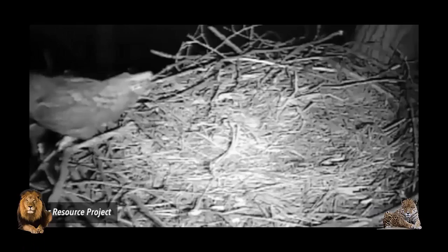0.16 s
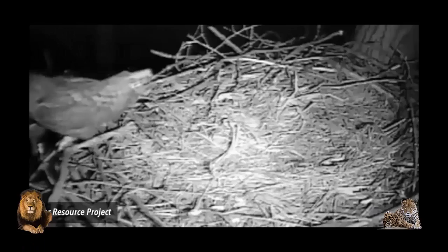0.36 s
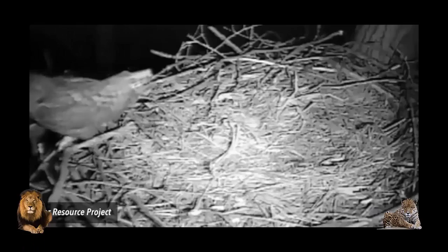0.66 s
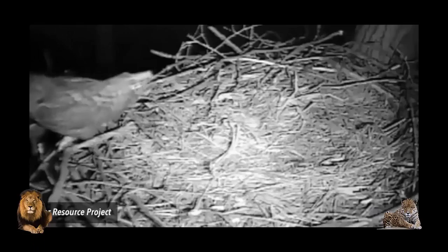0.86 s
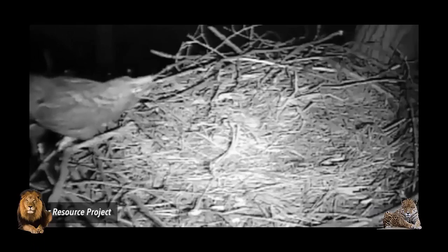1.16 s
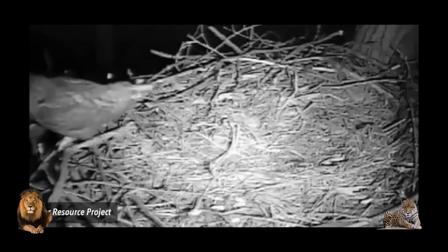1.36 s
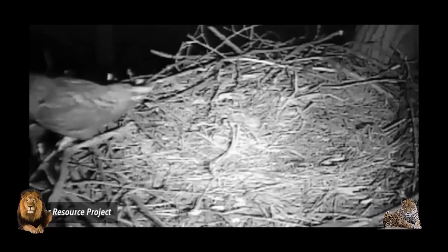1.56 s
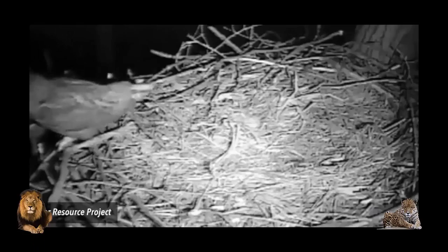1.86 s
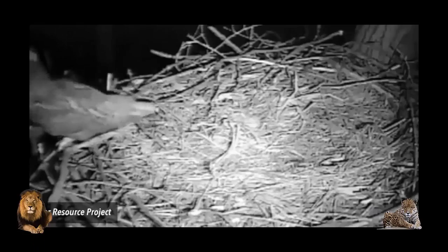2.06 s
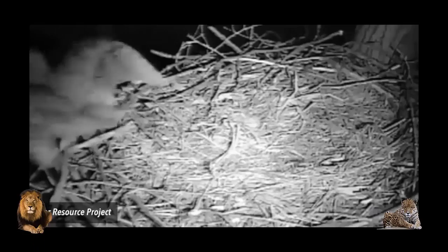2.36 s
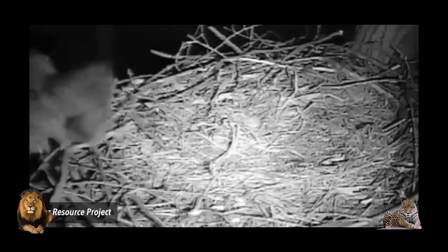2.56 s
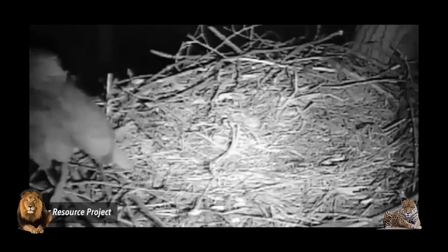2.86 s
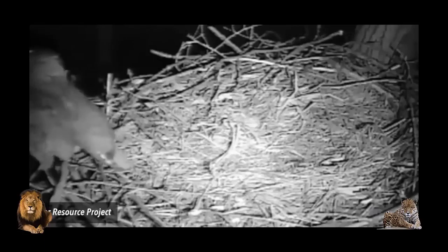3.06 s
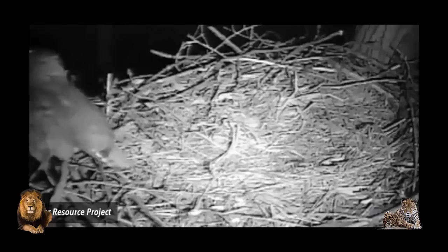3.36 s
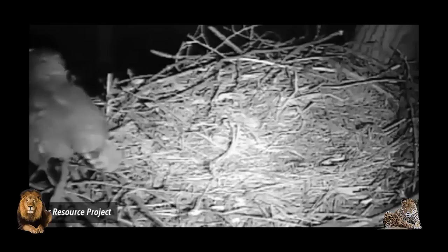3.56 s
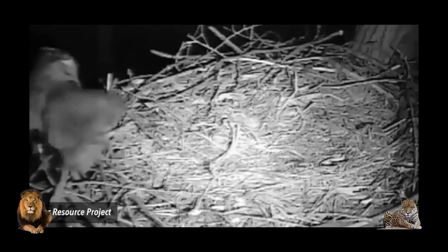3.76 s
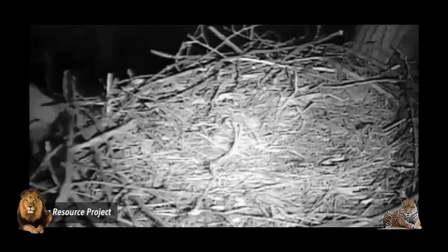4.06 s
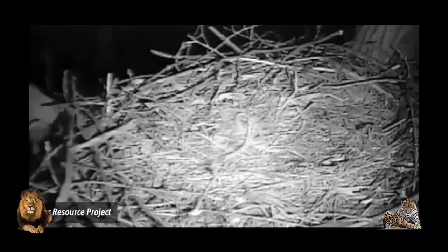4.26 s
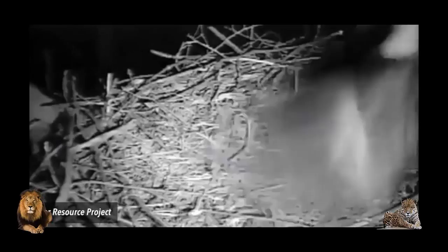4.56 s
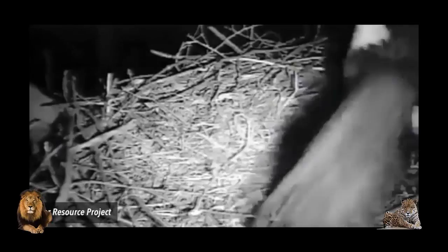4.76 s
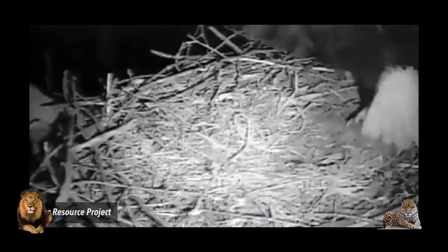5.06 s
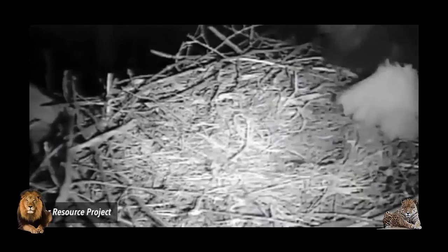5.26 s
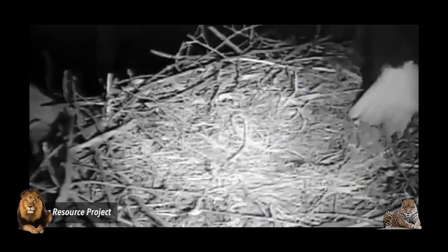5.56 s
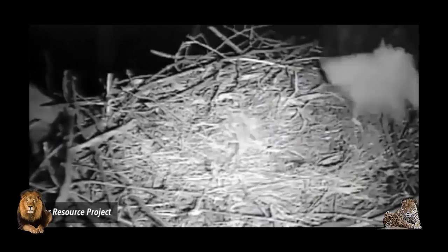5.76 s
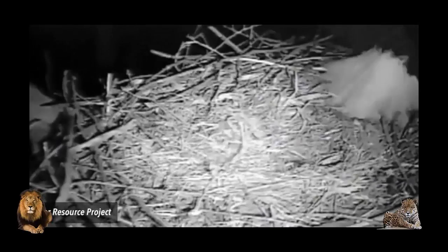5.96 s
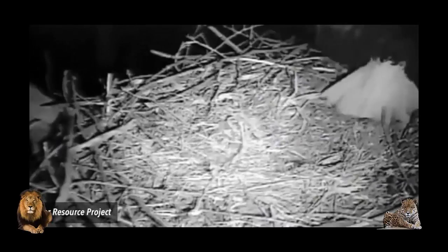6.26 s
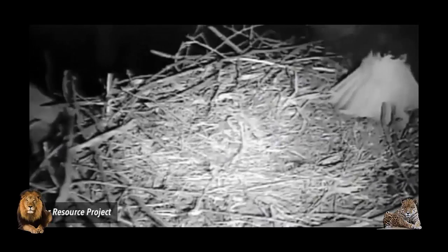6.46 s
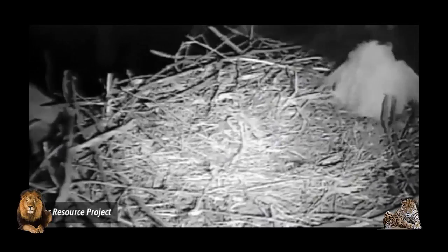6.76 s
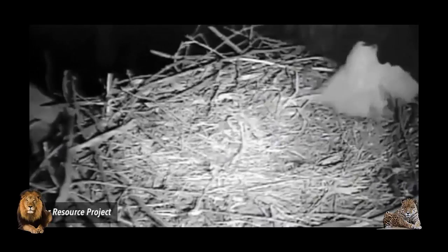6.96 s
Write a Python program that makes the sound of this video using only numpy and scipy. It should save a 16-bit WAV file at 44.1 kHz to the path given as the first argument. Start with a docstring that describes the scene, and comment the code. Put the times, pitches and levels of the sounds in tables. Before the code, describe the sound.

A nest microphone outdoors at night picks up soft low air noise and a faint mains hum, whose buzz grows later. At 0.7 s a very close owl gives a loud, round hoot around 300 Hz, about a third of a second, flattened by overload; a shorter, hoarser one comes at 1.5 s, rising slightly. From 1.95 to 2.45 s a farther owl answers with four quick arched hoots, then three falling ones from 3.05 to 3.4 s, blurred by trunk echoes. Faint clucks and grainy chitters begin near 2.6 s, ending in thin whistles at 3.65 s and, much louder and piercing, 3.87 s. Twigs scrape and knock; hard woody cracks hit at 4.18 and 4.5 s, the latter with a dull thud. Nasal yelps sound at 4.8 and 5.1 s. Bursts of stick knocks, snaps and straw scraping follow around 5.5 and 6.6 s, then subside to faint rustle by 7 s.

```python
"""An owl hoots twice, so close that the nest microphone overloads: throat tones with an octave and rushing air.
Its mate answers from the trees in short arched tones with trunk echoes. At an eagle's stick nest by night,
the eagle chitters (noise rasps, whistles), lands and treads on twigs and dry straw (filtered fractures,
ringing sticks, snaps, thuds), yelping (overtone stacks) meanwhile. Noise-made night air and mains hum lie below."""
import sys
import numpy as np
from scipy import signal
from scipy.fft import rfft, irfft
from scipy.io import wavfile
from scipy.ndimage import uniform_filter1d

SR = 44100
rng = np.random.default_rng(int(sys.argv[2]) if len(sys.argv) > 2 else 0)


def store_wav(level_fs):
    """Save 16-bit WAV to argv[1]."""
    pcm = np.round(np.clip(np.atleast_2d(level_fs), -1, 1) * 32767)
    wavfile.write(sys.argv[1], SR, pcm.T.astype(np.int16))


N = 314243
TIME = np.arange(N) / SR


def undb(db):
    """Decibels to gain."""
    return 10 ** (np.asarray(db) / 20)


def unit(x):
    """Scale to rms 1."""
    return x / np.sqrt(np.mean(x ** 2) + 1e-18)


def curves(rows, t=TIME):
    """The columns of a table, joined by straight lines in time."""
    s, *columns = np.transpose(rows)
    return [np.interp(t, s, c) for c in columns]


def add(out, start_s, x):
    """Mix x in at start_s."""
    i = max(int(start_s * SR), 0)
    out[i:i + len(x)] += x[:max(N - i, 0)]


def walk(rate_hz):
    """Smooth chance of rms 1, changing rate_hz times a second."""
    hold = max(int(SR / rate_hz), 1)
    steps = np.repeat(rng.standard_normal(N)[:N // hold + 1], hold)[:N]
    return unit(uniform_filter1d(steps, hold))


def turn(hz):
    """Phase of an oscillator that follows a pitch curve."""
    return 2 * np.pi * np.cumsum(hz) / SR


def envelope(age, attack_s, hold_s, release_s):
    """Swells up to age 0, holds, then dies away."""
    return np.exp(np.minimum(age, 0) / attack_s - np.maximum(age - hold_s, 0) / release_s)


def band(x, hz, width_hz):
    """One resonance, gain 1 at its centre."""
    centre_hz, width_hz = min(hz, SR / 3), min(width_hz, SR / 3)
    return signal.lfilter(*signal.iirpeak(centre_hz, hz / width_hz, fs=SR), x)


def colour(x, points, size=2048):
    """Minimum-phase filter shaped by (hz, db) points, scaled to unit impulse energy."""
    hz, db = np.transpose(points)
    bins_hz = np.arange(size // 2 + 1) * SR / size
    log_gain = np.log(undb(np.interp(np.log(bins_hz + 1), np.log(hz), db)))
    cepstrum = irfft(log_gain)
    # fold to the causal side
    cepstrum[1:size // 2] *= 2
    cepstrum[size // 2 + 1:] = 0
    response = irfft(np.exp(rfft(cepstrum)))
    return signal.fftconvolve(x, response / np.linalg.norm(response))[:len(x)]


def woods(x, t60_s):
    """Diffuse ring of the trees around the nest: a decaying noise tail, as strong as x."""
    t = np.arange(SR) / SR
    tail = rng.standard_normal(SR) * undb(-60 * t / t60_s) * (1 - np.exp(-t / .02))
    return unit(signal.fftconvolve(x, tail)[:N]) * np.std(x)


# night air spectrum: freq_hz, relative_db
AIR_SPECTRUM = [(20, -2.5), (55, -24), (95, -3.5), (170, -6.5), (300, -5), (600, -3), (900, -12),
                (1500, -21.5), (3000, -30.5), (7000, -33), (11000, -40.5)]


def night_air():
    """Faint coloured noise, slightly restless in level."""
    return unit(colour(rng.standard_normal(N), AIR_SPECTRUM)) * undb(-45.5 + 0.34 * walk(1.7))


# mains harmonics: multiple, relative_db
HUM_HARMONICS = [(1, 1), (2, -6.5), (3, -8.5), (4, -9), (5, -7.5), (6, -9), (7, -10)]
# hum level: time_s, base_db, third_multiple_extra_db
HUM_COURSE = [(0, -51.5, 1.5), (1.4, -49, -1), (2.4, -48, -1), (4, -49, 6.5), (5.8, -47.5, 6.5),
              (7.1, -49, 10)]
MAINS_HZ = 59.8


def mains_hum():
    """Harmonics of a slightly unsteady mains pitch; the third gains strength, so the buzz grows."""
    phase = turn(MAINS_HZ * (1 + 0.0019 * walk(5.5)))
    base_db, buzz_db = curves(HUM_COURSE)
    hum = 0
    for k, (_, relative_db) in enumerate(HUM_HARMONICS, 1):
        gain = undb(relative_db + (k == 3) * buzz_db + walk(6.2))
        hum = hum + gain * np.sin(k * phase + 2 * np.pi * rng.random())
    return np.sqrt(2) * undb(base_db) * hum


def crackle(rate_hz, spread_db):
    """Tiny fractures at random moments and signs, a few far larger than the rest; rms 1."""
    chance = rng.random((2, N))
    size = undb(spread_db * np.minimum(-np.log(chance[1] + 1e-9), 4))
    return unit((chance[0] < rate_hz / SR) * size * rng.choice([-1, 1], N))


# nest spectrum: freq_hz, relative_db
NEST_SPECTRUM = [(40, -18.5), (120, -6.5), (310, 0.5), (420, 0), (530, 0), (650, 0), (850, -4),
                 (1100, -8.5), (2000, -18.5), (2700, -31.5), (4500, -40.5), (7000, -41.5), (11000, -42)]
# ringing of the sticks, added to the nest: freq_hz, width_hz, relative_db
NEST_MODES = [(680, 430, -4.5), (1360, 47, -40), (1950, 600, -9)]


def through_nest(force):
    """The nest's woody body and the crisp top of its straw, split at 3.5 kHz, each at rms 1."""
    sound = colour(force, NEST_SPECTRUM)
    sound = sound + sum(undb(db) * band(sound, hz, width_hz) for hz, width_hz, db in NEST_MODES)
    body = signal.sosfilt(signal.butter(3, 3500, fs=SR, output="sos"), sound)
    top = signal.sosfilt(signal.butter(3, 3500, "high", fs=SR, output="sos"), sound)
    return unit(body), unit(top)


# width of one stick's own ring, struck or rubbed
RING_WIDTH_HZ = 122
# talons and feathers scraping: start_s, length_s, relative_db, crispness_db, stick_ring_hz
SCRAPE_EVENTS = [(3.695, 0.13, -42.5, -10, 380), (3.778, 0.027, -30.5, -18.5, 590),
                 (3.874, 0.029, -24, -19, 480), (3.918, 0.046, -32.5, -25, 715),
                 (4.12, 0.03, -18, -19.5, 595), (4.166, 0.016, -17.5, -14.5, 665),
                 (4.199, 0.099, -25.5, -12, 640), (4.319, 0.057, -38, -8.5, 640),
                 (4.434, 0.012, -35, -16, 590), (4.498, 0.028, -16.5, -17, 770),
                 (4.543, 0.075, -24, -8.5, 660), (4.705, 0.057, -32.5, -14.5, 545),
                 (4.919, 0.028, -21, -20.5, 670), (4.96, 0.028, -24, -20, 604),
                 (4.998, 0.058, -41.5, -5.5, 750), (5.18, 0.074, -46.5, -4, 640),
                 (5.343, 0.093, -39.5, -6.5, 570), (5.474, 0.027, -15, -17, 345),
                 (5.525, 0.058, -32.5, -13.5, 640), (5.607, 0.024, -30, -12.5, 810),
                 (5.789, 0.033, -32, -12.5, 680), (5.911, 0.052, -28, -14.5, 700),
                 (5.98, 0.13, -48.5, -1, 686), (6.128, 0.14, -42.5, -11, 666),
                 (6.509, 0.039, -39.5, -9, 664), (6.563, 0.068, -23.5, -12.5, 395),
                 (6.641, 0.055, -31, -16, 625), (6.76, 0.083, -41.5, -8, 480), (6.994, 0.17, -48, -7, 605)]
# faint rustle of feathers and straw under the moving bird: time_s, relative_db
STIRRING_COURSE = [(3.4, -48), (3.9, -42), (4.4, -49), (4.85, -31), (5.25, -40.5), (5.75, -44), (6.1, -47),
                   (7.1, -47)]
STIRRING_CRISP_DB = -13
# a scrape takes hold, lasts, lets go; the bent straw settles softer and crisper
SCRAPE_ATTACK_S, SCRAPE_RELEASE_S = 0.015, 0.013
SETTLE_DB, SETTLE_CRISP_DB, SETTLE_S = -20, 9, 0.087
BODY_DB, SCRAPE_RING_DB = -1.5, -4


def treading():
    """Talons drag in fits and starts: coarse fractures shake the nest and ring a stick, fine ones hiss."""
    coarse = crackle(rate_hz=1400, spread_db=3.6) * undb(2.2 * walk(70))
    body = through_nest(coarse)[0]
    fine = crackle(rate_hz=4000, spread_db=3) * undb(1.1 * walk(60))
    top = through_nest(fine)[1]
    body_power = undb(curves(STIRRING_COURSE)[0]) ** 2 * (TIME > STIRRING_COURSE[0][0])
    top_power = body_power * undb(STIRRING_CRISP_DB) ** 2
    rings = np.zeros(N)
    t = np.arange(-.06, .5, 1 / SR)
    for start_s, length_s, db, crisp_db, ring_hz in SCRAPE_EVENTS:
        drag = undb(db) * envelope(t, SCRAPE_ATTACK_S, length_s, SCRAPE_RELEASE_S)
        settle = undb(db + SETTLE_DB) * envelope(t, SCRAPE_ATTACK_S, length_s, SETTLE_S)
        onset_s = start_s + t[0]
        add(body_power, onset_s, drag ** 2 + settle ** 2)
        crisp_power = drag ** 2 + (undb(SETTLE_CRISP_DB) * settle) ** 2
        add(top_power, onset_s, undb(crisp_db) ** 2 * crisp_power)
        rubbed = drag * np.roll(body, -int(onset_s * SR))[:len(t)]
        add(rings, onset_s, band(rubbed, ring_hz, RING_WIDTH_HZ))
    shaken = undb(BODY_DB) * np.sqrt(body_power) * body
    return shaken + undb(SCRAPE_RING_DB) * rings + np.sqrt(top_power) * top


KNOCK_S = 1 / 8
# sticks knocking: start_s, peak_db, crispness_db, stick_ring_hz
KNOCK_EVENTS = [(3.782, -22, -13, 590), (3.802, -22, -27, 540), (3.957, -16.5, -29, 724),
                (4.083, -21.5, -32, 560), (4.11, -15.5, -15, 760), (4.184, 1.5, -36, 627),
                (4.425, -27, -30, 460), (4.488, -19, -16, 620), (4.502, 1, -9, 740), (4.514, 0.5, -35, 670),
                (4.605, -7.5, -30, 650), (4.657, -23, -25, 646), (4.705, -16, -16, 543),
                (4.884, -22, -28, 680), (5.07, -13, -26, 500), (5.408, -19, -24, 700),
                (5.416, -8.5, -21.5, 690), (5.47, -4.5, -23, 615), (5.513, -5.5, -24, 645),
                (5.603, -21.5, -28, 820), (5.672, -14, -14.5, 720), (5.79, -16.5, -19, 660),
                (5.896, -28, -16, 720), (6.098, -28.5, -38, 720), (6.166, -22, -22, 665),
                (6.466, -18.5, -21, 680), (6.55, -9.5, -25, 328), (6.562, -4.5, -10, 360),
                (6.607, -9.5, -30, 735), (6.623, -10.5, -27, 510), (6.696, -24, -20, 570),
                (6.724, -20, -11, 755), (6.832, -22, -13, 686)]


def knocks(t60_s=0.049, ring_db=2):
    """A blow with a quick cluster of fractures, through the nest, rings one stick."""
    out = np.zeros(N)
    t = np.arange(int(KNOCK_S * SR)) / SR
    fractures = crackle(rate_hz=4000, spread_db=0.93)
    for start_s, peak_db, crisp_db, ring_hz in KNOCK_EVENTS:
        cluster = fractures[int(start_s * SR):][:len(t)] * np.exp(-np.log(1000) * t / t60_s)
        cluster[0] += 7  # the blow
        body, top = through_nest(cluster)
        rung = unit(body + undb(ring_db) * band(body, ring_hz, RING_WIDTH_HZ))
        knock = rung + undb(crisp_db) * top
        add(out, start_s, undb(peak_db) * knock / np.abs(knock).max())
    return out


# thin straws snapping: start_s, peak_db, centre_hz
SNAP_EVENTS = [(3.591, -25.5, 2400), (3.74, -32, 7920), (4.359, -29, 6500), (4.618, -19, 4580),
               (5.513, -21, 8150), (5.672, -19.5, 7100), (6.563, -25, 5000), (6.723, -28.5, 8700),
               (6.833, -49, 3000)]


def snaps(t60_s=0.0071):
    """Straws snap singly: a very short noise burst through one resonance."""
    out = np.zeros(N)
    t = np.arange(int(KNOCK_S * SR)) / SR
    for start_s, peak_db, centre_hz in SNAP_EVENTS:
        burst = rng.standard_normal(len(t)) * np.exp(-np.log(1000) * t / t60_s)
        snap = band(burst, centre_hz, 1500)
        add(out, start_s, undb(peak_db) * snap / np.abs(snap).max())
    return out


# the eagle's weight on the nest: start_s, level_db (before decay), pitch_hz, t60_s
THUD_EVENTS = [(4.511, -20, 58, 0.15), (4.512, -7.5, 107, 0.077), (5.476, -21, 102, 0.077),
               (6.562, -24.5, 90.5, 0.076)]


def thuds():
    """The whole nest gives under the bird: decaying low sines."""
    out = np.zeros(N)
    t = np.arange(int(KNOCK_S * SR)) / SR
    for start_s, level_db, pitch_hz, t60_s in THUD_EVENTS:
        fade = np.exp(-np.log(1000) * t / t60_s)
        add(out, start_s, undb(level_db) * np.sin(2 * np.pi * pitch_hz * t) * fade)
    return out


# eagle's chitter notes: start_s, rasp_db, whistle_db
CHITTER_NOTES = [(2.755, -42.5, -51), (2.97, -46.5, -47), (3.213, -41.5, -41), (3.392, -45, -44),
                 (3.64, -36, -22.5), (3.863, -32, -11)]
LOW_RASP_DB = -8  # against the high rasp


def chitter():
    """A high grainy rasp around a short piercing whistle, ending in a fainter, lower rasp."""
    out = np.zeros(N)
    t = np.arange(-.03, .14, 1 / SR)
    high_swell = envelope(t - 0.005, attack_s=0.0087, hold_s=0, release_s=0.029)
    low_swell = envelope(t - 0.04, attack_s=0.033, hold_s=0, release_s=0.036)
    air = rng.standard_normal(N) * undb(2.84 * walk(260))
    high = unit(band(band(air, 4550, 1200), 4550, 1200)) + undb(-8) * unit(band(air, 9000, 2500))
    low = unit(band(band(air, 2000, 2300), 2700, 2300))
    # a strong beat and a weaker one
    beats = np.exp(-((t - .0122) / .0052) ** 2) + .35 * np.exp(-((t - .022) / .0035) ** 2)
    whistle = beats * np.sin(2 * np.pi * 4440 * t)
    for start_s, rasp_db, whistle_db in CHITTER_NOTES:
        now = int(start_s * SR) + np.arange(len(t))
        rasp = high_swell * high[now] + undb(LOW_RASP_DB) * low_swell * low[now]
        add(out, start_s + t[0], undb(rasp_db) * rasp + undb(whistle_db) * whistle)
    return out


# clucks and yelps: start_s, length_s, pitch_hz, level_db, db_per_overtone, roughness_share_of_pitch
YELP_CALLS = [(2.565, 0.019, 1950, -44.5, -13, 0.14), (2.801, 0.014, 1950, -41, -17, 0.06),
              (3.006, .012, 2120, -41.5, -19, 0.068), (3.044, 0.0055, 1670, -33.5, -27, 0.21),
              (3.459, 0.011, 2020, -41, -21, 0.092), (4.786, 0.062, 1750, -26, -10, 0.046),
              (5.075, 0.0453, 1690, -31, -8.5, 0.041)]


def yelps():
    """Short hoarse clucks and nasal yelps: three harmonics scooping up to pitch under a fast tremor."""
    out, tremor = np.zeros(N), walk(1200)
    for start_s, length_s, pitch_hz, level_db, overtone_db, rough in YELP_CALLS:
        age_share = np.linspace(0, 1, int(length_s * SR))
        scoop = 0.56 * np.exp(-age_share / 0.1024)
        shake = rough * tremor[int(start_s * SR):][:len(age_share)]
        phase = turn(pitch_hz * (1 - scoop + shake))
        tone = sum(undb(k * overtone_db) * np.sin((k + 1) * phase) for k in range(3))
        add(out, start_s, undb(level_db) * np.sin(np.pi * age_share) ** 2 * tone)
    return out


def eagle(branch_s=.039, branch_db=-17):
    """Calls with one short, duller echo off a branch beside the nest and a faint ring from the trees."""
    calls = chitter() + yelps()
    echo = np.interp(TIME - branch_s, TIME, uniform_filter1d(calls, size=8))
    return calls + undb(branch_db) * echo + undb(-27.5) * woods(calls, t60_s=0.42)


def hoot(hz, second_db, skew_rad, jitter, shake_rad=0):
    """A nearly pure throat tone; its octave stands out when it nears the 435 Hz throat resonance."""
    phase = turn(hz * (1 + jitter * walk(140))) + shake_rad
    octave = undb(second_db) * (1 + 2 / (1 + ((2 * hz - 435) / 75) ** 2))
    return np.sin(phase) + octave * np.sin(2 * phase - skew_rad)


# answering owl's syllables: middle_s, half_length_s, pitch_hz, level_db
ANSWER_SYLLABLES = [(1.977, 0.047, 396.7, -19), (2.169, .042, 395, -17.5), (2.304, 0.042, 391.4, -19),
                    (2.393, 0.043, 384.6, -17), (3.083, .053, 395.2, -17), (3.209, .066, 380.4, -18.5),
                    (3.325, 0.063, 356.8, -24)]
# echoes off tree trunks: delay_s, relative_db
TRUNK_ECHOES = [(.052, -10.5), (.098, -12.5), (.178, -22.5), (.255, -24.5)]
# pitch between syllables; loudness as a power of effort; flatness of a syllable's top
ANSWER_SLACK_HZ, ANSWER_POWER, ANSWER_FLATNESS = 304, 1.44, 2.78


def far_owl():
    """The stuttering answer arches per syllable and beats with its echoes; overtones arrive as a blur."""
    hz, loud = ANSWER_SLACK_HZ, 0
    for middle_s, half_s, pitch_hz, level_db in ANSWER_SYLLABLES:
        effort = np.exp(-np.abs((TIME - middle_s) / half_s) ** ANSWER_FLATNESS)
        hz = hz + (pitch_hz - ANSWER_SLACK_HZ) * effort
        loud = loud + undb(level_db) * effort ** ANSWER_POWER
    voice = loud * hoot(hz, second_db=-35, skew_rad=.3, jitter=.005)
    echoes = sum(undb(db) * np.interp(TIME - delay_s, TIME, voice) for delay_s, db in TRUNK_ECHOES)
    ring = undb(-19) * woods(voice, t60_s=1.0)
    rectified = np.abs(voice) * (1 + 1.6 * walk(260))
    overtones = band(band(rectified, 700, 700), 700, 700)
    return voice + echoes + ring + undb(-18) * woods(overtones, t60_s=.4)


# near hoots: start_s, length_s, pitch_hz, drift_hz_per_s, scoop_s, level_db, hoarse_start_db, hoarse_end_db
NEAR_HOOTS = [(.7, 0.341, 308.5, -40.5, .026, 2, -30, -27.5),
              (1.527, .22, 283.6, 57.5, 0.021, -1, -27.5, -14.5)]
# a slack throat is low and soft; effort lifts pitch and level, and collapses at the end of a hoot
SLACK_HZ, SLACK_DB, SAG_S, FADE_DB_PER_S = 205.8, -25, .021, -19.5
# the voice cracks as effort passes this share
CRACK_AT, CRACK_WIDTH, CRACK_DB = .75, 0.069, -25.5
# waver in strength, and in pitch as a share
FLUTTER_DB, FLUTTER_SHARE = .8, .0025


def near_owl():
    """Two hoots scoop up and sag with effort; hoarseness shakes the cycles and lets air rush through."""
    voice = 0
    for start_s, length_s, pitch_hz, drift, scoop_s, level_db, first_db, last_db in NEAR_HOOTS:
        age = np.clip(TIME - start_s, -.06, length_s + .06)
        effort = 1 - np.exp(-age / scoop_s) - np.exp((age - length_s) / SAG_S)
        from_middle_s = age - length_s / 2
        target_hz = pitch_hz + drift * from_middle_s
        hz = SLACK_HZ + (target_hz - SLACK_HZ) * np.maximum(effort, 0)
        loud_db = level_db + FADE_DB_PER_S * from_middle_s + SLACK_DB * (1 - effort)
        loud = undb(loud_db + FLUTTER_DB * walk(44.23))
        crack = undb(CRACK_DB) * np.exp(-((effort - CRACK_AT) / CRACK_WIDTH) ** 2)
        hoarse = undb(np.interp(age, [0, length_s], [first_db, last_db])) + crack
        shake_rad = .6 * hoarse * walk(700)
        tone = loud * hoot(hz, second_db=-16, skew_rad=0.33, jitter=FLUTTER_SHARE, shake_rad=shake_rad)
        air = unit(band(band(rng.standard_normal(N), 700, 1000), 700, 1000))
        voice = voice + tone + .85 * hoarse * np.abs(tone) * air
    return voice + undb(-44) * woods(voice, t60_s=1.0)


def scene():
    """Everything that reaches the nest microphone."""
    background = night_air() + mains_hum()
    nest = treading() + knocks() + snaps() + thuds()
    return (background + nest + eagle() + far_owl() + near_owl())[None]


def record(dry, ceiling=0.26, knee=11, limit_rms=0.24, react_s=0.018, top_hz=10450):
    """Overload into flat tops, slow limiter, slight random level variation, two treble peaks, low-pass."""
    clipped = dry / (1 + np.abs(dry / ceiling) ** knee) ** (1 / knee)
    step = 1 / (react_s * SR)
    power = signal.lfilter([step], [1, step - 1], clipped ** 2)
    limited = clipped / (1 + (power / limit_rms ** 2) ** 4) ** (1 / 8)
    varied = limited * undb(.6 * walk(35))
    bright = varied + undb(-14.5) * band(varied, 4180, 330) + undb(1) * band(varied, 9280, 1100)
    return signal.sosfilt(signal.ellip(8, .2, 70, top_hz, fs=SR, output="sos"), bright)


dry = scene()
out = record(dry)
store_wav(out)
```